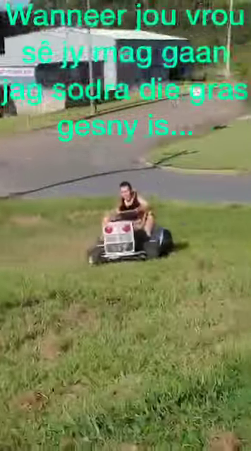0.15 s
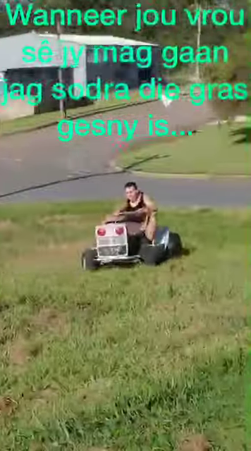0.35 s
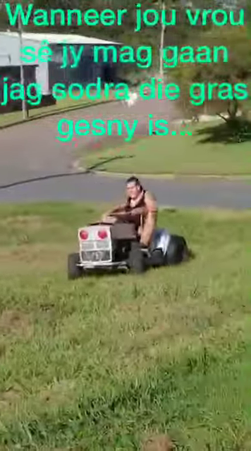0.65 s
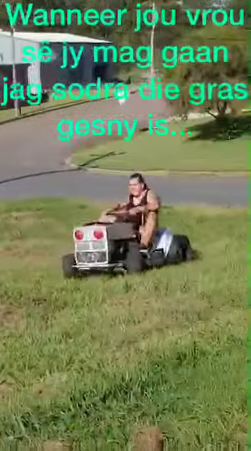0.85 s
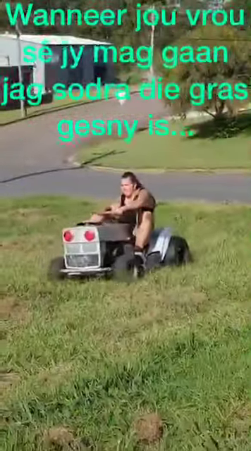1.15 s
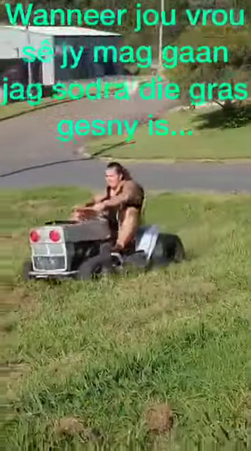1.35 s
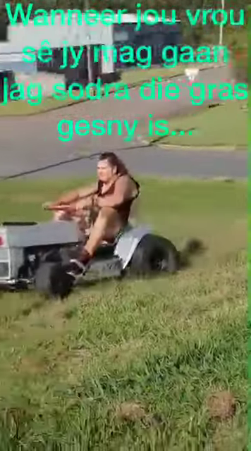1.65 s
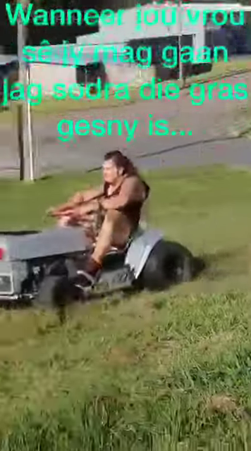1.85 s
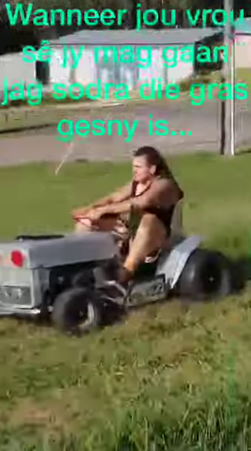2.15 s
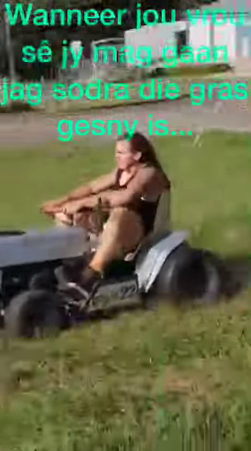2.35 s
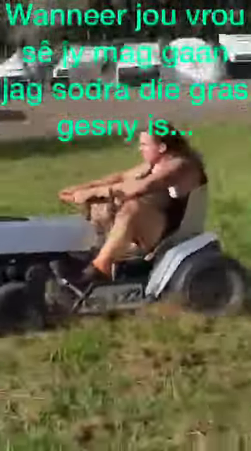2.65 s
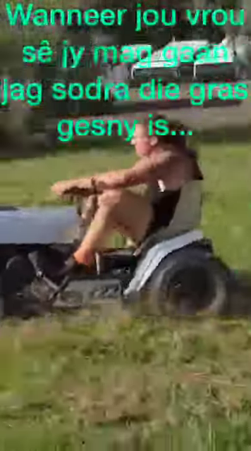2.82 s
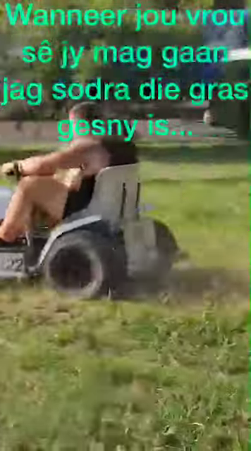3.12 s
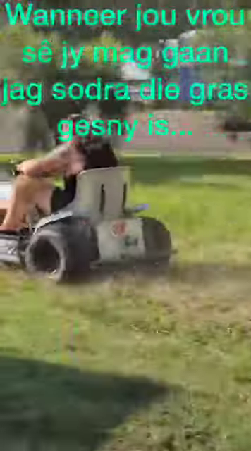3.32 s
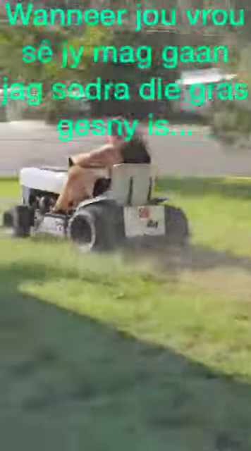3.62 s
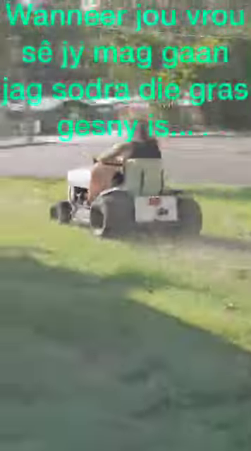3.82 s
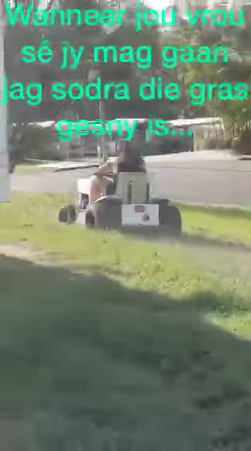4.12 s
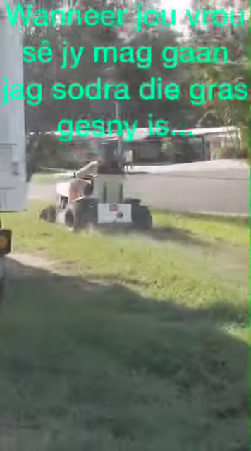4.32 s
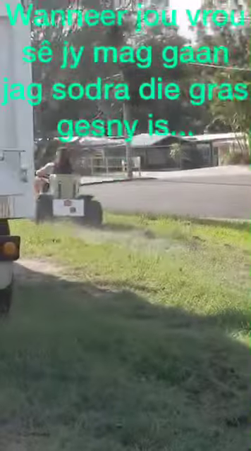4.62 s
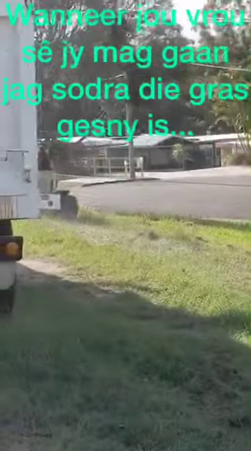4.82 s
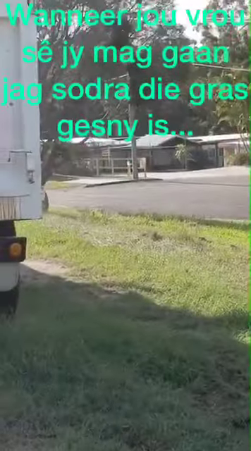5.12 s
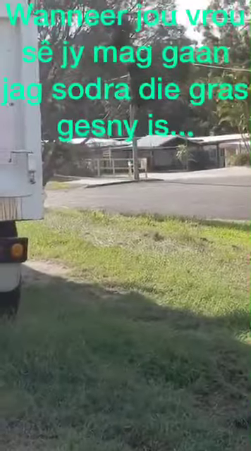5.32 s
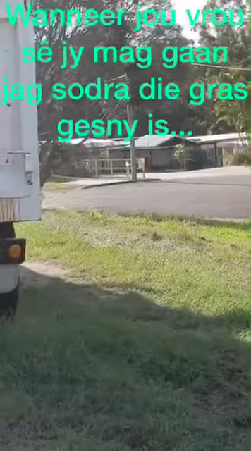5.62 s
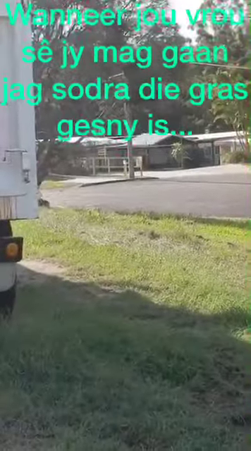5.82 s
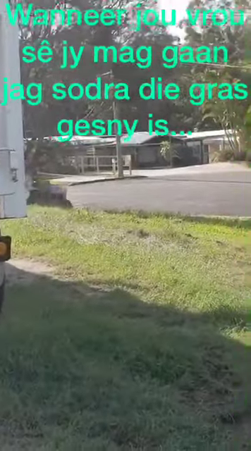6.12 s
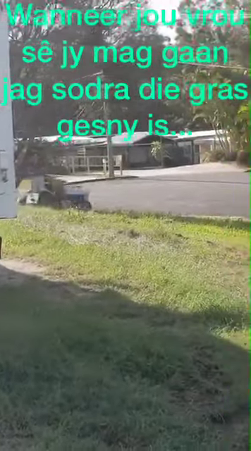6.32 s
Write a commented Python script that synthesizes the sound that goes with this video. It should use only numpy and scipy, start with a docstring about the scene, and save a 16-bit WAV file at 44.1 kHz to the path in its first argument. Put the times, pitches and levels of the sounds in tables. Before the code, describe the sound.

A high-revving mower engine rasps hard twice, sagging in between, then winds down to a low burble with light throttle blips.

```python
"""A high-revving engine, like a racing motorbike's, rasps through two hard pulls outdoors, sagging and
recovering, then drops to a dull burble with three light pulls. Unevenly spaced exhaust pulses ring in
the pipe over a hum of low crank orders and a rush of gas. Firings boom in the muffler, which pops now
and then, as pulls end or begin and while coasting.
Low wind, a few thin chirps and two faint ticks lie underneath."""
import sys
import numpy as np
from scipy import signal
from scipy.fft import rfft, irfft
from scipy.io import wavfile
from scipy.ndimage import uniform_filter1d, map_coordinates

SR = 44100
rng = np.random.default_rng(int(sys.argv[2]) if len(sys.argv) > 2 else 0)


def generate_wav(sig):
    """Save sig (samples, or channels by samples) to the path in sys.argv[1] as 16-bit PCM at SR."""
    pcm = np.round(np.clip(np.atleast_2d(sig).T, -1, 1) * 32767).astype(np.int16)
    wavfile.write(sys.argv[1], SR, pcm)


N = 285327
TIME = np.arange(N) / SR
HUM_ORDERS = (1, 2, 4, 6)
# Muffler response. Each row: frequency in Hz, relative gain in dB.
MUFFLER_RESPONSE = [(40, -42), (110, -11.5), (170, 15), (290, 4), (420, -9.5), (780, -3.5), (1000, -32),
                    (3000, -39), (8000, -91)]


def gain_of(db):
    """Decibels to a factor."""
    return 10 ** (np.asarray(db) / 20)


def unit_rms(x):
    """Scales x to rms 1."""
    return x / np.sqrt(np.mean(x ** 2) + 1e-20)


def curves(rows):
    """Columns of a timed table, interpolated per sample."""
    times_s, *columns = np.transpose(rows)
    return [np.interp(TIME, times_s, column) for column in columns]


def bump(peak_s, half_s):
    """Gaussian swell of height 1."""
    return np.exp(-((TIME - peak_s) / half_s) ** 2)


def wander(hz):
    """Random drift of rms 1, rolled off above hz."""
    spectrum = rfft(rng.standard_normal(N))
    return unit_rms(irfft(spectrum / (1 + (np.fft.rfftfreq(N, 1 / SR) / hz) ** 4), N))


def impulse_response(response):
    """Minimum-phase ring of a body with the given (Hz, dB) response."""
    hz, db = np.transpose(response)
    bin_hz = abs(np.fft.fftfreq(4096, 1 / SR)) + 1
    log_gain = np.log(gain_of(np.interp(np.log(bin_hz), np.log(hz), db)))
    return np.fft.ifft(np.exp(np.conj(signal.hilbert(log_gain)))).real[:2048]


def colour(x, response):
    """Passes x through such a body."""
    return signal.oaconvolve(x, impulse_response(response))[:N]


def bandpass(x, band_hz):
    """Zero-phase band filter."""
    return signal.sosfiltfilt(signal.butter(4, band_hz, "band", fs=SR, output="sos"), x)


def steadied(x, band_hz):
    """Rides the gain of x to hold one band at rms 1."""
    power = uniform_filter1d(bandpass(x, band_hz) ** 2, size=2048)
    return x / np.sqrt(abs(power) + 1e-12)


def pulls(open_s=0.087, cut_s=0.046, close_s=0.67, climb_s=0.57, fade_db_per_s=31):
    """Each pull takes hold, builds and lets go; the throttle then drifts shut and the rasp fades."""
    # Each row: start and end in seconds, throttle 0-1, then in dB the rasp's top, its climb to that top,
    # its drop at the end, and the lift of the upper hum orders.
    schedule = [(-0.08, 1.268, 1, -27.5, 15, 8.5, -1.5), (1.422, 3.255, 0.88, -18, 18, 16.5, 1.5),
                (3.809, 4.43, 0.17, -44.5, 0.5, 2.5, 0), (4.89, 5.225, 0, -54, 2, 9.5, 6),
                (5.905, 6.398, 0.05, -66.5, 0, 25, 5)]
    load, throttle, rasp_gain, upper_db = np.zeros((4, N))
    for start_s, end_s, opening, top_db, climb_db, drop_db, lift_db in schedule:
        since_s, after_s = np.maximum(TIME - start_s, 0), np.maximum(TIME - end_s, 0)
        rise, cut = np.minimum(since_s / open_s, 1), np.minimum(after_s / cut_s, 1)
        load += rise * (1 - cut)
        throttle = np.maximum(throttle, opening * rise * (1 - (after_s / close_s) ** 2))
        db = top_db - climb_db * np.exp(-since_s / climb_s) - drop_db * cut - fade_db_per_s * after_s
        rasp_gain = np.maximum(rasp_gain, rise * gain_of(db))
        upper_db += lift_db * rise * (1 - cut)
    return load, np.clip(throttle, 0, 1), 20 * np.log10(rasp_gain + 1e-9), upper_db


def strain(crank_hz, window_s=0.13, scale_hz=7.1):
    """From -1 in a brief sag of the revs to 1 at a crest."""
    mean_hz = uniform_filter1d(crank_hz, size=round(window_s * SR))
    return np.tanh((crank_hz - mean_hz) / scale_hz)


def order_levels_db(crank_hz, upper_db):
    """Relative level of each hum order: its drive plus the resonance it is sweeping through."""
    # Drive of orders 1 and 2, of order 4 and of order 6. Each row: time in seconds, relative level in dB.
    low_drive = [(0.0, -23), (0.32, -21.5), (1.27, -17), (1.29, -23), (1.51, -9), (2.67, -13.5),
                 (2.94, -23.5), (3.2, -20), (3.26, -25), (3.7, -13), (4.03, -22), (4.27, -16), (4.45, -20),
                 (4.6, -20), (4.93, -25.5), (5.1, -20.5), (5.23, -23), (5.25, -20), (5.48, -18),
                 (5.53, -18), (5.65, -24.5), (5.69, -25), (5.97, -30), (6.05, -19.5), (6.15, -22.5),
                 (6.35, -19), (6.47, -30)]
    fourth_drive = [(0, -44), (.35, -36.5), (.5, -54.5), (.74, -37.5), (1.15, -34), (1.78, -40), (2.0, -36),
                    (2.42, -32), (2.55, -38.5), (2.72, -43), (3.1, -37), (3.75, -32.5), (4.3, -34.5),
                    (4.7, -36), (6.0, -39.5), (6.2, -39), (6.34, -31.5), (6.47, -40)]
    sixth_drive = [(0, -53), (1.9, -43.5), (2.25, -49), (2.6, -41), (3.1, -52), (3.5, -54.5), (4.3, -40.5),
                   (6.47, -47)]
    # Surges of order 2 while coasting. Each row: peak time in seconds, boost in dB.
    surges = [(3.49, 1.5), (3.596, 0), (3.705, 0.5), (4.52, 2.5), (4.67, 1.5), (4.79, 5), (5.43, 2.5)]
    # Exhaust resonances. Each row: frequency in Hz, gain in dB.
    resonances = [(80, -30), (110, -17.5), (135, -11.5), (165, -4), (180, 2), (205, 3.5), (255, -3),
                  (305, 2.5), (328, -1.5), (348, 0.75), (400, -1), (520, 3), (590, 4.5), (635, 7.5),
                  (690, 7.5), (785, 14.5), (850, 13.5), (980, 22.5), (1070, 20.5), (1200, 18.5)]
    low_db = curves(low_drive)[0]
    surge_db = sum(db * bump(peak_s, half_s=0.03) for peak_s, db in surges)
    drives_db = (low_db - 2.5, low_db + surge_db,
                 upper_db + curves(fourth_drive)[0], upper_db + curves(sixth_drive)[0])
    hz, db = np.transpose(resonances)
    return np.array([drive_db + np.interp(np.log(order * crank_hz), np.log(hz), db)
                     for order, drive_db in zip(HUM_ORDERS, drives_db)])


def hum(turns, levels_db, throttle, low_lag_turns=0.118, upper_lag_turns=0.045):
    """Low crank orders trail the sharp pulses; the upper two lope and flutter as the throttle shuts."""
    low_angle, upper_angle = 2 * np.pi * (turns - low_lag_turns), 2 * np.pi * (turns - upper_lag_turns)
    levels = gain_of(levels_db)
    tone = np.zeros(N)
    for order, level in zip(HUM_ORDERS[:2], levels):
        tone += level * (1 + 0.07 * wander(hz=16)) * np.cos(order * low_angle)
    lope_depth = 0.13 + 0.27 * (1 - throttle)
    for order, level in zip(HUM_ORDERS[2:], levels[2:]):
        lope = np.cos(upper_angle / 2) + wander(hz=25) / 4
        tone += level * (1 + lope_depth * lope) * np.cos(order * upper_angle)
    # Unequal cylinders give order 1, and with it order 3 and a beat over the two-turn cycle.
    tone += levels[0] * (gain_of(-17) * np.cos(3 * low_angle) + 0.058 * np.cos(1.5 * low_angle))
    return np.sqrt(2) * tone


def rasp(turns, throttle, coasting, stagger_turns=0.005, jitter_turns=0.0036):
    """Two sharp pulses a turn, the second mostly weaker and late, ring in the exhaust pipe."""
    # Second pulse, shifting with load. Each row: time in seconds, ratio to the first, lateness in turns.
    second_pulse = [(0, 1, 0.024), (1.28, 0.51, 0.0061), (1.5, 0.59, 0.02), (1.8, 0.89, 0.021),
                    (1.95, 0.87, 0.028), (2.4, 0.96, 0.026), (2.55, 0.88, 0.032), (2.82, 1, 0.026),
                    (2.98, 0.79, 0.013), (3.27, 0.92, 0.02), (4.4, 0.99, 0.017), (5.0, 1, 0.017),
                    (6.0, 1, 0.0082)]
    # Pipe response, throttle open and shut. Each row: frequency in Hz, relative gain in dB.
    pipe_open = [(300, -7), (500, 14.5), (700, 20), (1000, 19.5), (1250, 17.5), (1450, 18.5), (1750, 9),
                 (2300, 9.5), (2600, 2), (2830, 4.5), (3150, 3), (3600, 0.5), (5000, -6), (6700, -24),
                 (8000, -45.5)]
    pipe_shut = [(280, 21), (380, 30.5), (540, 17), (660, 38), (760, 29.5), (860, 27), (980, 15),
                 (1120, 13), (1400, -8), (2000, 8), (3000, -30), (5000, -7)]
    cycle_angle = np.pi * turns - np.pi / 4  # four firings span two turns
    angle = 2 * np.pi * (turns + stagger_turns * np.sin(cycle_angle) + jitter_turns * wander(hz=230))
    second_ratio, late_turns = curves(second_pulse)
    second_ratio *= 1 + 0.17 * wander(hz=15)
    late_turns += 0.0057 * wander(hz=19)
    second_angle = angle - 2 * np.pi * (0.5 + late_turns)
    pulses = sum(np.cos(order * angle) + second_ratio * np.cos(order * second_angle)
                 for order in range(1, 50) if order not in HUM_ORDERS)
    # Starved of air, the engine lopes more; coasting, it also fires unevenly.
    shut = 1 - throttle
    lope = (0.18 + 0.083 * shut) * np.cos(cycle_angle)
    roughness = (0.05 + 0.25 * coasting) * wander(hz=280)
    pulses *= 1 + roughness + lope
    pipe = throttle * colour(pulses, pipe_open) + shut * colour(pulses, pipe_shut)
    return steadied(pipe, band_hz=(1250, 2600))


def puffs(turns, hardness, decay_firings=0.25):
    """Gas flow envelope: each firing lets out a quick puff of its own strength."""
    firing, since = np.divmod(2 * turns, 1)
    strength = np.exp(0.2 * rng.standard_normal(N))[firing.astype(int)]
    height = 0.6 + 0.06 * np.minimum(hardness, 10)
    return 1 + height * strength * np.exp(-since / decay_firings)


def rush(turns, throttle, hardness, flicker_db=1.31, bounce_s=0.0016):
    """Turbulent gas; the harder the pulses, the more it comes in puffs."""
    # Gas spectrum, throttle open and shut. Each row: frequency in Hz, relative density in dB.
    gas_open = [(60, -23.5), (170, 8), (300, 3), (600, -2), (1200, 2.5), (2300, 0.5), (2600, 3),
                (2800, 8.5), (3000, 4), (3200, 4), (3900, 0.5), (5000, 3), (6200, -1.5), (7300, 0),
                (7900, -27.5), (10500, -13), (12000, -35.5)]
    gas_shut = [(60, -3), (200, 15.5), (700, 9), (900, 8.5), (1100, 3), (1700, 1), (2400, -6.5), (3000, -3),
                (4000, -5), (5400, -6.5), (6800, -7.5), (7600, -20), (10500, -16.5), (12000, -21)]
    flow = rng.standard_normal(N) * puffs(turns, hardness)
    # A reflection over a swaying path combs the rush with shifting peaks.
    delay_s = bounce_s * (1 + 0.086 * wander(hz=3.4))
    flow += 0.38 * map_coordinates(flow, [(TIME - delay_s) * SR])
    gas = throttle * colour(flow, gas_open) + (1 - throttle) * colour(flow, gas_shut)
    return steadied(gas, band_hz=(3500, 7000)) * gain_of(flicker_db * wander(hz=23))


def burble(turns, coasting, note_db, pull_db=-36, coast_db=-30.5):
    """Firings boom in the muffler: a lope under load, ragged while coasting, louder with the hum."""
    # Signed extra boom of each of the four firings in a two-turn cycle.
    firing_pattern = [0.71, -1.23, -0.74, 0.17]
    fired = np.flatnonzero(np.diff(np.floor(2 * turns)))
    scatter = 0.35 + coasting[fired]
    booms = scatter * rng.standard_normal(len(fired)) + np.resize(firing_pattern, len(fired))
    kicks = np.zeros(N)
    kicks[fired] = booms / np.hypot(1, scatter)
    level_db = pull_db + (coast_db - pull_db) * coasting + 0.51 * (note_db - note_db.mean())
    return gain_of(level_db) * unit_rms(colour(kicks, MUFFLER_RESPONSE))


def wind(gust_db=2.5):
    """Lumpy low rumble."""
    # Each row: time in seconds, level in dB.
    strength = [(0, -35), (0.7, -42), (1.4, -37), (2.1, -42), (2.65, -64), (3.1, -58), (3.8, -41.5),
                (5.3, -40.5), (5.85, -39), (6.2, -33), (6.47, -29.5)]
    # Each row: frequency in Hz, relative density in dB.
    spectrum = [(15, -48), (45, -4), (80, -2.5), (120, -1), (250, -11), (800, -59)]
    rumble = colour(rng.standard_normal(N), spectrum) * gain_of(gust_db * wander(hz=13))
    return gain_of(curves(strength)[0]) * unit_rms(rumble)


def snarls(pipe):
    """Exhaust resonances flare up for a moment, mostly at crests of the revs."""
    # Each row: peak time and half length in seconds, centre and width in Hz, gain of the added band in dB.
    flares = [(0.697, 0.11, 1044, 250, 10), (1.16, 0.17, 2980, 550, 12), (1.959, 0.097, 1130, 595, -1),
              (2.255, 0.095, 1300, 299.8, -7), (2.691, 0.077, 2700, 300, 10), (2.2, 0.14, 3028, 240, 7),
              (2.959, 0.094, 3368, 398.5, 1), (3.236, 0.041, 5000, 1208, 11.5),
              (3.368, 0.063, 1521, 252, 1), (3.537, 0.11, 1400, 249.4, 2), (4.66, 0.13, 687, 298, 4.5),
              (5.141, 0.1, 1184, 300, 9.5), (5.612, 0.051, 684, 149.8, 14.5), (6.12, 0.063, 719.6, 99.2, 4),
              (6.221, 0.068, 944, 120, 10)]
    return sum(gain_of(db) * bump(peak_s, half_s) * bandpass(pipe, (hz - width_hz / 2, hz + width_hz / 2))
               for peak_s, half_s, hz, width_hz, db in flares)


def pops():
    """Unburnt fuel goes off in the muffler."""
    # Each row: time in seconds, peak in dB.
    backfires = [(1.278, -13.5), (1.466, -12), (3.281, -8), (3.289, -11.5), (3.86, -19), (3.873, -13),
                 (3.905, -14), (5.748, -21), (5.808, -21.5), (5.857, -23), (5.878, -24)]
    kicks = np.zeros(N)
    for start_s, peak_db in backfires:
        kicks[round(start_s * SR)] = gain_of(peak_db)
    return colour(kicks, MUFFLER_RESPONSE) / abs(impulse_response(MUFFLER_RESPONSE)).max()


def chirps(waver=0.0081, twitter_db=4.0):
    """Short, arched, twittering whistles."""
    # Each row: start and length in seconds, pitch at start, middle and end in Hz, level in dB.
    whistles = [(3.743, 0.12, 5376, 5490, 5430, -47), (4.778, 0.16, 4900, 5400, 5325, -45.5),
                (5.154, 0.17, 4585, 5136, 5100, -47.5), (5.25, 0.2, 3230, 3070, 3010, -51.5),
                (5.28, 0.19, 5750, 5550, 4970, -54), (5.77, 0.089, 3115, 3090, 3230, -52.5),
                (5.86, 0.082, 3550, 3766, 3870, -46.5), (5.881, 0.0518, 7200, 7740, 7920, -46.5),
                (6.135, 0.05, 7240, 7030, 7040, -44.5), (6.196, 0.061, 5400, 5230, 5356, -45),
                (6.183, 0.051, 4350, 4350, 4167, -47.5)]
    sound = np.zeros(N)
    drift = 1 + waver * wander(hz=110)
    for start_s, length_s, *pitches_hz, db in whistles:
        span = np.flatnonzero((TIME >= start_s) & (TIME < start_s + length_s))
        progress = np.linspace(0, 1, len(span))
        hz = np.polyval(np.polyfit([0, 0.5, 1], pitches_hz, 2), progress) * drift[span]
        envelope = np.sqrt(2 * abs(np.sin(np.pi * progress)))
        sound[span] += gain_of(db) * envelope * np.sin(2 * np.pi * np.cumsum(hz) / SR)
    return sound * unit_rms(gain_of(twitter_db * wander(hz=39)))


def distant(x, wet_db=-1, t60_s=0.061):
    """Scattered outdoor echoes soften a far sound."""
    t = TIME[:SR // 2]
    tail = rng.standard_normal(len(t)) * gain_of(-60 * t / t60_s)
    return x + gain_of(wet_db) * signal.oaconvolve(x, tail / np.linalg.norm(tail))[:N]


def ticks():
    """Faint, dry, scratchy ticks."""
    # Each row: peak time in seconds, level in dB.
    bursts = [(4.68, -38), (4.963, -43.5)]
    envelope = sum(gain_of(db) * bump(peak_s, half_s=0.016) for peak_s, db in bursts)
    return envelope * unit_rms(bandpass(rng.standard_normal(N), band_hz=(2200, 7000)))


def scene(strain_db=5.5, hunt_db=2.31, echo_s=0.00431):
    """The engine sits just left of centre; a reflection, the rush and the wind spread to the sides."""
    # Each row: time in seconds, crank turns per second.
    revs = [(0, 168), (0.06, 181), (0.14, 175), (0.28, 181), (0.405, 177), (0.44, 187), (0.54, 189),
            (0.6, 189), (0.7, 183.5), (0.8, 196.5), (.86, 193), (0.93, 190), (1.03, 197), (1.12, 201),
            (1.22, 197), (1.28, 191), (1.31, 182), (1.47, 120), (1.51, 126), (1.72, 134.3), (1.79, 138),
            (1.86, 141), (1.92, 153), (1.98, 159), (2.02, 159), (2.06, 148.5), (2.22, 162), (2.31, 165),
            (2.36, 151.5), (2.48, 161), (2.54, 169), (2.58, 166), (2.7, 162), (2.82, 166.6), (2.93, 174),
            (2.99, 174.4), (3.06, 179), (3.105, 180), (3.16, 179), (3.22, 179.4), (3.28, 189), (3.32, 174),
            (3.44, 142.8), (3.82, 122.7), (3.92, 128.6), (4.16, 124.6), (4.28, 130), (4.38, 129),
            (4.46, 124), (4.58, 111.3), (4.88, 97), (5.04, 111.7), (5.24, 103), (5.38, 89.8), (5.64, 85.4),
            (5.8, 64.6), (5.92, 68), (6.04, 88.7), (6.35, 96.7), (6.46, 93)]
    # Each row: time in seconds, relative level of the gas in dB.
    gas_level = [(0.0, -25), (0.03, -26), (1.22, -20), (1.41, -29), (1.8, -23.5), (2.97, -24.5),
                 (3.19, -28), (3.26, -27.5), (3.32, -32.5), (3.46, -37.5), (3.93, -39), (4.13, -45),
                 (4.33, -40), (4.46, -36.5), (4.52, -43), (5.86, -47.5), (5.87, -45.5), (6.47, -44.5)]
    # Each row: time in seconds, left minus right in dB.
    balance = [(0, .25), (2.4, .25), (3.3, .65), (6.47, .9)]
    crank_hz, rush_db = curves(revs)[0], curves(gas_level)[0]
    turns = np.cumsum(crank_hz) / SR
    load, throttle, rasp_db, upper_db = pulls()
    coasting = (1 - load) * (1 - throttle)
    rasp_db += strain_db * load * strain(crank_hz)
    upper_db -= 12.5 * throttle * (1 - load)  # upper orders sink just after a hard pull
    hardness = gain_of(rasp_db - rush_db)
    hunting = gain_of(hunt_db * (1 - load) * wander(hz=11.6))  # the hum wavers between pulls
    pipe = gain_of(rasp_db) * rasp(turns, throttle, coasting)
    levels_db = order_levels_db(crank_hz, upper_db)
    note = hunting * hum(turns, levels_db, throttle)
    exhaust = note + pipe + snarls(pipe) + burble(turns, coasting, levels_db[1]) + pops()
    middle = exhaust + gain_of(rush_db - 4.5) * rush(turns, throttle, hardness)
    middle = middle + wind() + distant(chirps()) + ticks()
    echo = gain_of(-16) * np.interp(TIME - echo_s, TIME, bandpass(exhaust, band_hz=(430, 5000)))
    side = echo + gain_of(rush_db - 13.5) * rush(turns, throttle, hardness) + gain_of(-10.5) * wind()
    pan = gain_of(np.outer([0.5, -0.5], curves(balance)[0]))
    return np.array([middle + side, middle - side]) * pan


def record(dry, ceiling=1.05, cutoff_hz=12200):
    """Rounds off the tallest peaks, then low-passes."""
    rounded = dry / (1 + (dry / ceiling) ** 6) ** (1 / 6)
    lowpass = signal.firwin(511, cutoff_hz, window=("kaiser", 9), fs=SR)
    return signal.oaconvolve(rounded, lowpass[None], "same")


dry = scene()
out = record(dry)
generate_wav(out)
```